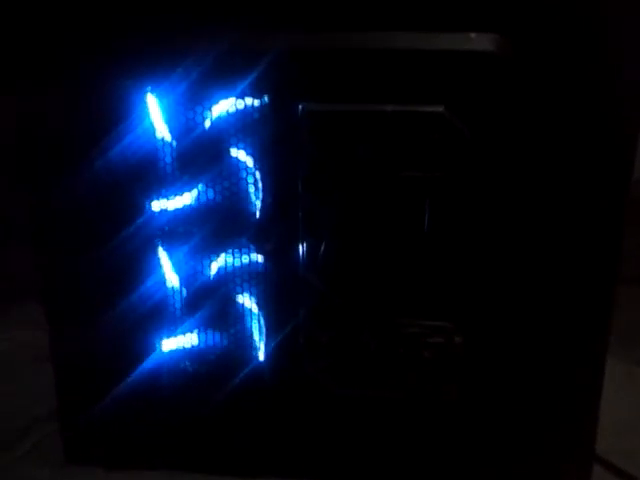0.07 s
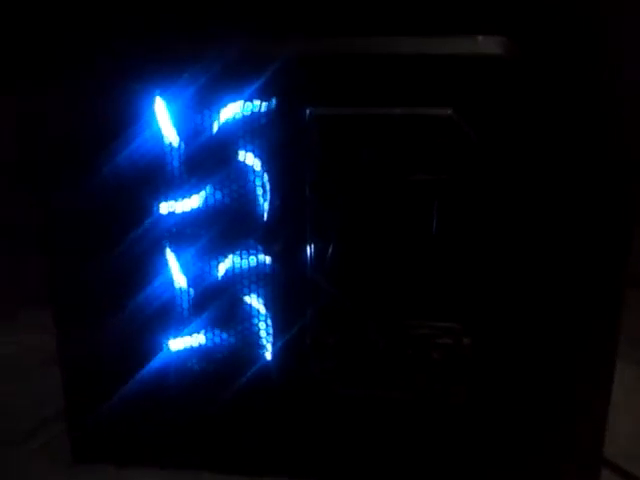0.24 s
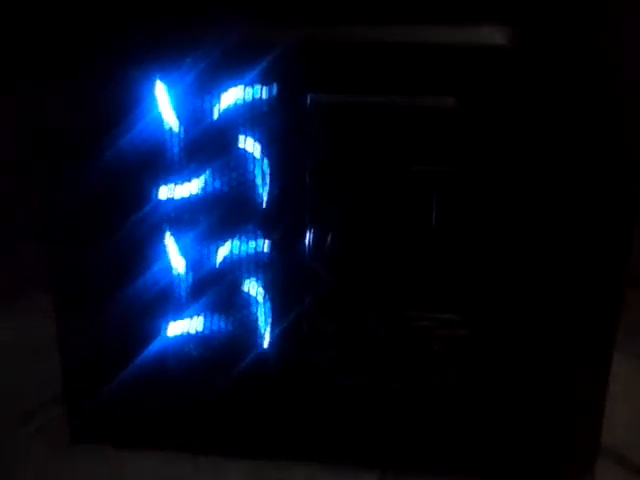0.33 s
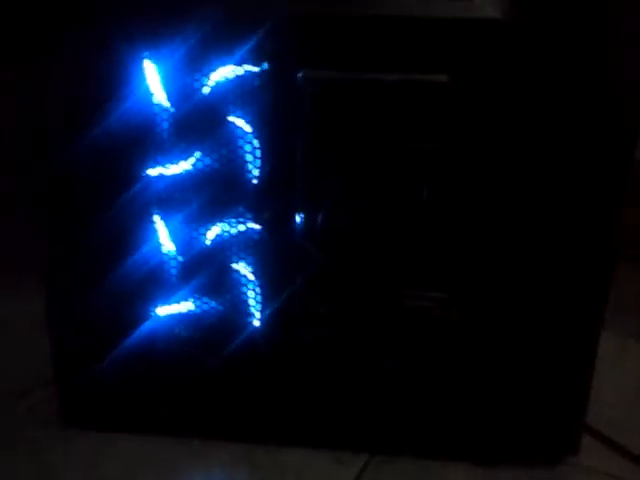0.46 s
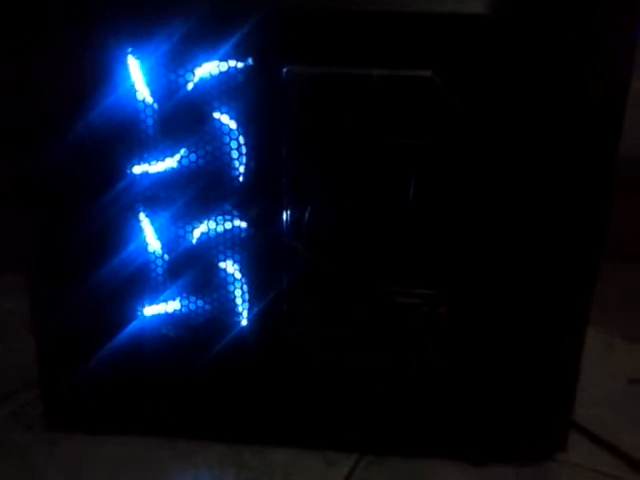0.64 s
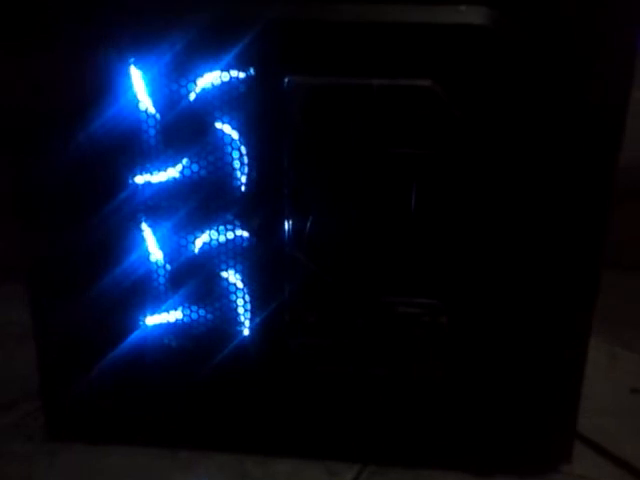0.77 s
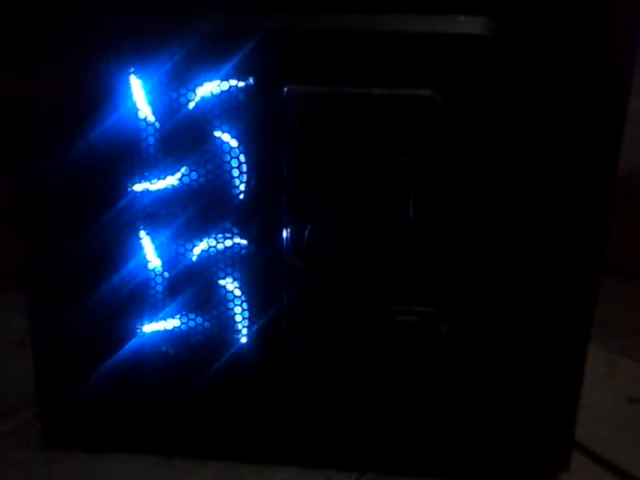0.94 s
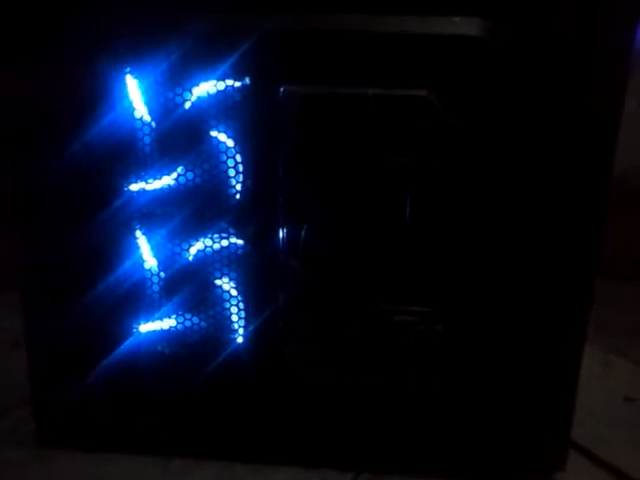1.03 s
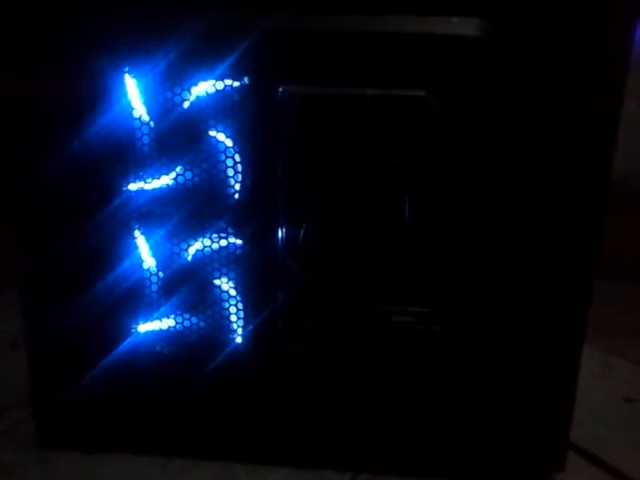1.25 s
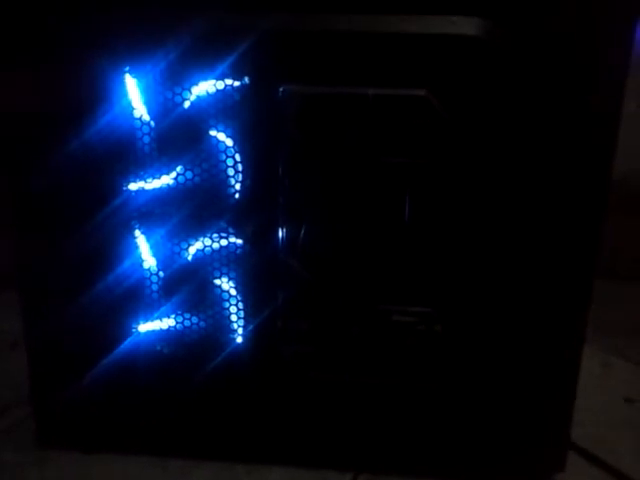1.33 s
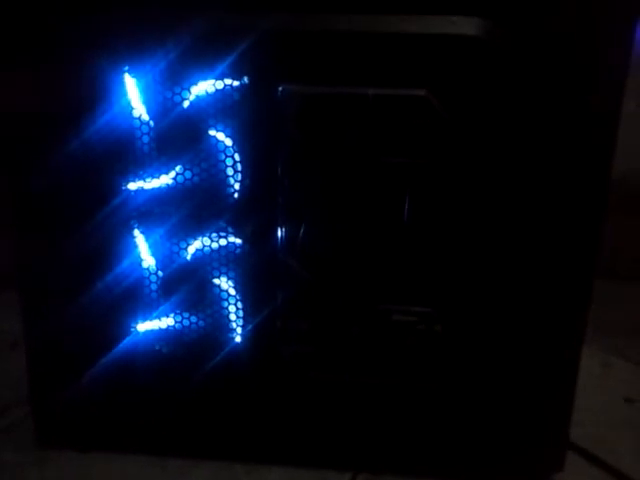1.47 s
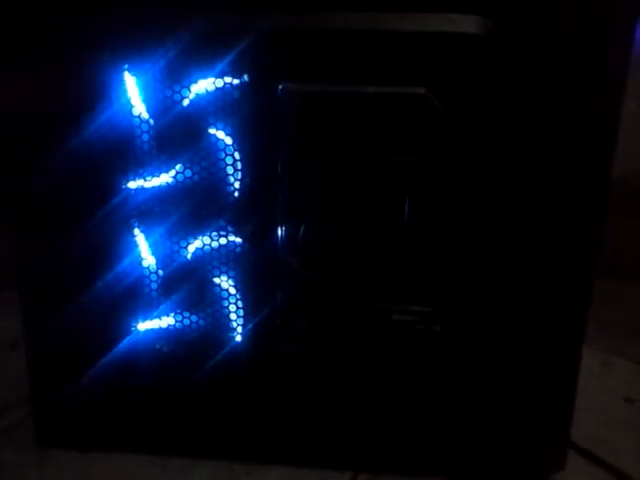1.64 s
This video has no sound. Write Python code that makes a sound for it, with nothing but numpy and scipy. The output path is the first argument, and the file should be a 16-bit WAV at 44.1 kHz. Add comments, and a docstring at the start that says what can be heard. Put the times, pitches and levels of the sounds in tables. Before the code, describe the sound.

Computer cooling fans whoosh steadily for about 1.7 seconds, soft breathy air over low case hum and mid-low motor tones near 900 hertz that beat together, one rising very slightly. At about 0.09 seconds a small dry plastic click, then at 0.23 a much louder sharp pop, from fingers on the hand-held shell. Air swells slightly around 0.4 to 0.6, then eases. Quiet room, muffled top end.

```python
"""Two cooling fans of a computer case run at slightly different speeds in a quiet room.
Each fan is a stack of wavering sines on multiples of its speed, and the two stacks beat together.
Shaped noise makes the whoosh of air through the mesh, and narrow wandering sines hum below.
Early on, a hand-held plastic shell pops twice under the fingers: sagging thumps and ringing ticks."""
import sys
import numpy as np
from scipy import signal
from scipy.io import wavfile
from scipy.ndimage import uniform_filter1d

SR = 44100
rng = np.random.default_rng(int(sys.argv[2]) if len(sys.argv) > 2 else 0)


def pcm_store(signal):
    """Save signal as 16-bit PCM."""
    levels = np.round(np.clip(np.atleast_2d(signal), -1, 1) * 32767)
    wavfile.write(sys.argv[1], SR, levels.astype(np.int16).T)


def voltage_ratio(decibels):
    """Convert decibels (scalar or array-like) to amplitude ratios, 20 dB per decade."""
    exponent = np.asarray(decibels, float) / 20
    return 10 ** exponent


N = 74970  # length in samples


def evened(x):
    """Scales to rms 1."""
    return x / np.sqrt(np.mean(x ** 2) + 1e-20)


def curve(points):
    """Draws straight lines between (time_s, value) points, at every sample."""
    time_s, value = np.transpose(points)
    return np.interp(np.arange(N) / SR, time_s, value)


def slow(top_hz):
    """Random wander of rms 1: sines from 0.4 Hz to top_hz, weaker as they get faster."""
    t = np.arange(0, N + 64, 64) / SR
    wander = np.zeros(len(t))
    for hz in np.geomspace(0.4, top_hz, num=16):
        wander += np.sin(2 * np.pi * (hz * t + rng.random())) / np.sqrt(hz)
    return evened(np.interp(np.arange(N) / SR, t, wander - wander.mean()))


def add(mix, start_s, sound):
    """Mixes a sound in at start_s."""
    part = mix[round(start_s * SR):][:len(sound)]
    part += sound[:len(part)]


def fan(base_hz, orders):
    """Motor tones on whole multiples of one speed, each wavering and slowly changing in level."""
    waver_db, waver_top_hz = 0.7, 14
    t = np.arange(N) / SR
    turns = np.cumsum(base_hz * np.ones(N)) / SR
    tones = np.zeros(N)
    for multiple, start_db, growth_db_per_s in orders:
        level_db = start_db + growth_db_per_s * t + waver_db * slow(waver_top_hz)
        tone = np.sin(2 * np.pi * (round(multiple) * turns + rng.random()))
        tones += np.sqrt(2) * voltage_ratio(level_db) * tone  # root 2 turns rms into peak
    return tones


# motor tones of the steady fan: multiple, start_rms_db, growth_db_per_s
STEADY_TONES = [(1, -65, -1.5), (3, -63.5, -0.28), (4, -60.5, -1.8), (5, -72, .1), (6, -69.5, .1),
                (7, -80, .1), (8, -75.5, .1), (9, -71, -1.1), (16, -88, .1)]


def steady_fan():
    """A motor holding one speed, so its tones keep their pitch."""
    return fan(234.45, STEADY_TONES)  # base tone in Hz


# speed of the drifting fan, heard in its fourth multiple: time_s, pitch_hz
DRIFT_PITCH = [(0, 904.5), (.6, 904.6), (.8, 906.5), (1., 907.5), (1.3, 909), (1.7, 909.8)]
# motor tones of the drifting fan: multiple, start_rms_db, growth_db_per_s
DRIFT_TONES = [(1, -71, -1), (2, -72, -0.5), (4, -57, -0.04), (5, -79, -1), (8, -71.5, 3.5)]


def drifting_fan():
    """A slower motor gaining a little speed, which moves all its tones together."""
    return fan(curve(DRIFT_PITCH) / 4, DRIFT_TONES)


# color of the air noise: pitch_hz, relative_level_db (per Hz)
AIR_COLOR = [(15, -35.5), (25, -19.5), (45, -20.5), (103, -9), (226, -8), (560, -8.5), (800, -9),
             (1030, -10), (1530, -13.5), (2260, -16.5), (3200, -21), (4500, -25), (6320, -30.5),
             (7000, -30), (7700, -37.5), (8500, -32), (9500, -39.5), (20000, -34.5)]
# slow changes of the whole air level: time_s, gain_db
AIR_GAIN = [(0, -3.4), (.2, -1.6), (.26, -1.1), (.4, 1), (.6, 0.95), (.85, -0.24), (1.2, -0.32),
            (1.7, -1.7)]
# slow changes of the air's treble against its bass: time_s, gain_db
AIR_TREBLE = [(0, 3), (0.399, 0.5), (.9, 1.34), (1.3, -1), (1.7, 0.4)]


def air():
    """Turbulence through the mesh: colored noise with faint patches and a slight swell."""
    level_db, swell_db, patch_db = -52.5, 1.21, -0.74  # swell and patches are rms depths
    treble_hz = 1200  # half of the treble gain applies here
    size, hop = 2048, 512
    frames, hz = N // hop + 5, np.fft.rfftfreq(size, 1 / SR)
    real, imaginary, patches = rng.standard_normal((frames, len(hz), 3)).T
    patches = uniform_filter1d(patches, size=20, axis=0)  # across pitch
    patches = evened(uniform_filter1d(patches, size=6, axis=1))  # across time

    color_hz, color_db = np.transpose(AIR_COLOR)
    color = np.interp(np.log(hz + 1), np.log(color_hz + 1), color_db)[:, None]
    spectrum = (real + 1j * imaginary) * voltage_ratio(color + patch_db * patches)

    frame_s = (np.arange(frames) - 2) * hop / SR  # where each frame begins
    treble_db = np.interp(frame_s, *np.transpose(AIR_TREBLE))
    treble_share = (hz ** 2 / (hz ** 2 + treble_hz ** 2))[:, None]
    spectrum *= voltage_ratio(treble_db * treble_share)

    noise = evened(signal.istft(spectrum, nperseg=size, noverlap=size - hop)[1][:N])
    return noise * voltage_ratio(level_db + curve(AIR_GAIN) + swell_db * slow(top_hz=14))


def thump(peak_db, start_hz, t60_ms, sag_turns, push):
    """A dull push whose pitch sags as the shell settles; the deepest part does not radiate."""
    rise_turns, low_cut = 0.45, 0.04  # in periods of, and as a fraction of, the starting pitch
    t = np.arange(1500) / SR
    wave = np.sin(2 * np.pi * sag_turns * np.log1p(start_hz * t / sag_turns))
    wave *= 1 - np.exp(-start_hz * t / rise_turns)
    wave *= voltage_ratio(-60 * 1000 * t / t60_ms)
    wave = signal.lfilter(*signal.butter(2, low_cut * start_hz, "high", fs=SR), wave)
    return np.sign(push) * voltage_ratio(peak_db) * wave / abs(wave).max()


# ringing modes of one tick: pitch_ratio (to the tick's main pitch), level_db, t60_ms
RINGING = [(1.002, 4.5, 2.34), (1.3, -1.5, 2.1), (1.65, -2, 2), (2.2, -16, 3.66)]


def tick(peak_db, main_hz, push):
    """A dry snap ringing a few short modes."""
    rise_ms = 0.18
    ms = np.arange(400) / SR * 1000
    wave = np.zeros(len(ms))
    for ratio, level_db, t60_ms in RINGING:
        wave += voltage_ratio(level_db - 60 * ms / t60_ms) * np.sin(2 * np.pi * ratio * main_hz * ms / 1000)
    wave *= 1 - np.exp(-ms / rise_ms)
    return np.sign(push) * voltage_ratio(peak_db) * wave / abs(wave).max()


# thumps of the shell: start_s, peak_db, start_hz, t60_ms,
# sag_turns (periods of start_hz until the pitch has halved), push (sign of the first swing)
SHELL_THUMPS = [(.0902, -34, 500, 6, 1.5, 1), (.09115, -27.5, 950, 9, .33, -1),
                (.1178, -42, 700, 12, 1.1, 1), (.2116, -34, 1400, 6, 1.5, -1),
                (.2245, -37, 1250, 8, 1.5, -1), (.23125, -6.5, 1400, 6.2, .85, -1),
                (.2342, -24, 750, 10, 4, 1)]
# ticks of the shell: start_s, peak_db, main_hz, push (sign of the first swing)
SHELL_TICKS = [(.0927, -41, 5500, 1), (.095, -33, 2700, 1), (.09597, -24, 2700, 1), (.0964, -22, 2300, 1),
               (.2116, -37, 3100, -1), (.2307, -22, 2000, -1), (.23135, -12, 2950, -1)]


def shell_pops():
    """Plastic giving way under the fingers: each pop is a tight cluster of thumps and ticks."""
    shell = np.zeros(N)
    for start_s, *settings in SHELL_THUMPS:
        add(shell, start_s, thump(*settings))
    for start_s, *settings in SHELL_TICKS:
        add(shell, start_s, tick(*settings))
    return shell


# low tones of the case: pitch_hz, width_hz (twice the rms pitch wander), rms_db (before HUM_GAIN)
HUM_TONES = [(52.4, 1.2, -68), (72.8, 1.5, -67), (156, 3, -68)]
# level of all the hums together: time_s, gain_db
HUM_GAIN = [(0, -2), (.4, -1.5), (.85, -4), (1.15, 0), (1.7, -1.5)]


def hums():
    """Low tones of the case, wandering slightly in pitch and wavering in level."""
    waver_db, waver_top_hz = 1.5, 14
    tones = np.zeros(N)
    for pitch_hz, width_hz, rms_db in HUM_TONES:
        level = np.sqrt(2) * voltage_ratio(rms_db + waver_db * slow(waver_top_hz))
        turns = np.cumsum(pitch_hz + 0.5 * width_hz * slow(top_hz=3.6)) / SR
        tones += level * np.sin(2 * np.pi * (turns + rng.random()))
    return voltage_ratio(curve(HUM_GAIN)) * tones


def scene():
    """Air, fans, hums and pops, summed to one channel."""
    return (air() + steady_fan() + drifting_fan() + hums() + shell_pops())[None]


def roll_off(x):
    """The treble ends steeply here."""
    return signal.sosfilt(signal.butter(12, 8840, fs=SR, output="sos"), x)


def record(dry):
    """Dulls the top with a short low-pass whose gentle window leaks a little above the edge."""
    low_pass = signal.firwin(numtaps=39, cutoff=7250, window=("kaiser", 1.4), fs=SR)
    finished = signal.oaconvolve(dry, low_pass[None], "same")
    return roll_off(finished)


dry = scene()
out = record(dry)
pcm_store(out)
```